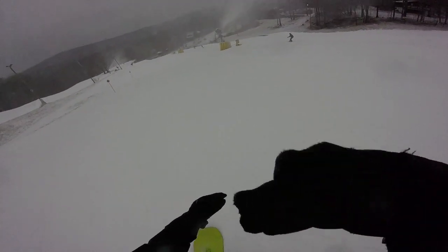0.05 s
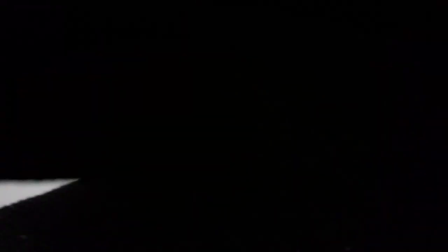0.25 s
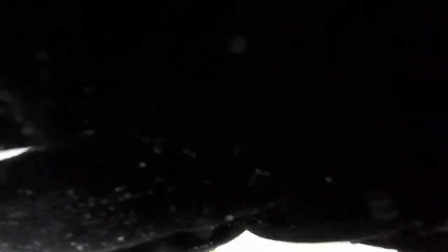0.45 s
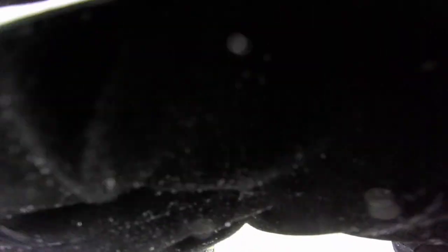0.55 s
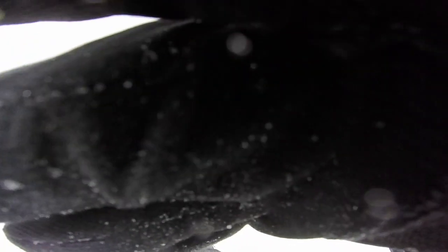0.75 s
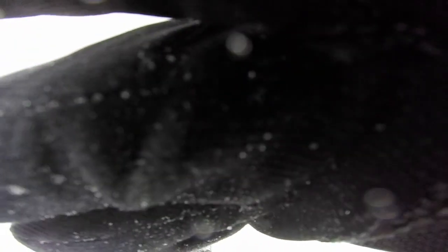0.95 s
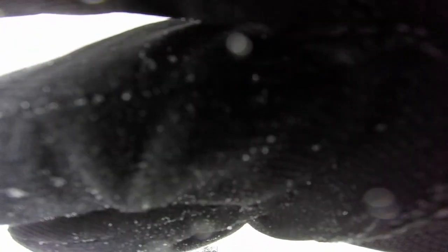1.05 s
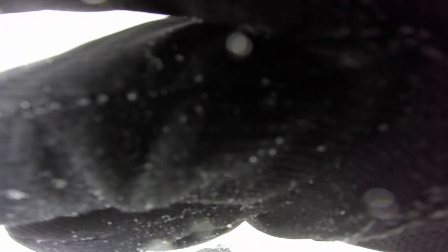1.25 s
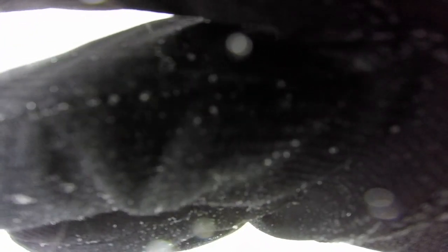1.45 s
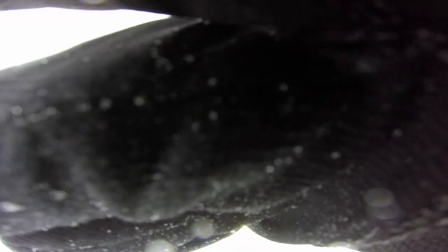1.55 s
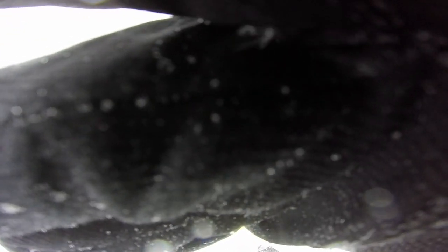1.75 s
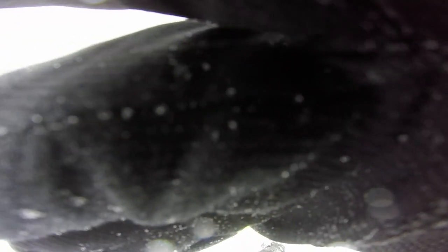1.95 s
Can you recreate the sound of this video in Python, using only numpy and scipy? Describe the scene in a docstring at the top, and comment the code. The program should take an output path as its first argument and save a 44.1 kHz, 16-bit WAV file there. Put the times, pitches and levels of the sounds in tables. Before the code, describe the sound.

Hollow plastic knocks and glove scuffs on a handled camera, over wind and snow hiss.

```python
"""Close, hollow plastic knocks, scuffs and low thumps over a hiss of snow and a rumble of wind.
A gloved hand grabs an action camera in its case while the rider slides down a snowy slope.
Knocks ring the case and the camera body; the glove ticks, drags and presses thumps into the microphone.
Rushing air and sliding snow hiss through the case's resonances, and gusts buffet it from outside."""
import sys
import numpy as np
from scipy import signal
from scipy.fft import rfft, irfft
from scipy.io import wavfile
from scipy.ndimage import uniform_filter1d

SR = 44100
rng = np.random.default_rng(int(sys.argv[2]) if len(sys.argv) > 2 else 0)


def transcribe(signal):
    """Save signal, clipped to [-1, 1], as a 16-bit WAV file at the path in sys.argv[1]."""
    frames = np.atleast_2d(signal).T
    limited = np.clip(frames, -1, 1)
    pcm = np.round(limited * 32767).astype(np.int16)
    wavfile.write(sys.argv[1], SR, pcm)


N = 88200

# bright spectrum of tiny impacts on the case, for glove ticks and snow spray: f/Hz, relative level/dB
TICK_SPECTRUM = [(300, -16), (1000, -17), (2200, -1.5), (4000, -1.5), (5500, -6), (8000, 0.5),
                 (10000, -8.5), (16000, -18)]


def undb(db):
    """Decibels to gain."""
    return 10 ** (np.asarray(db) / 20)


def unit(x):
    """Scale to rms 1."""
    return x / np.sqrt(np.mean(x ** 2) + 1e-18)


def since(start):
    """Seconds since a moment, zero before it."""
    return np.maximum(np.arange(N) / SR - start, 0)


def curve(table, column=1):
    """One column of a table joined by straight lines in time."""
    rows = np.array(table)
    return np.interp(since(0), rows[:, 0], rows[:, column])


def colour(x, points):
    """Minimum-phase EQ through (f/Hz, level/dB) points; result at rms 1."""
    hz, db = np.array(points).T
    bins = np.maximum(np.arange(N // 2 + 1) * SR / N, 1)
    gain = undb(np.interp(np.log(bins), np.log(hz), db))
    cepstrum = irfft(np.log(gain), N)
    cepstrum[1:N // 2] *= 2
    cepstrum[N // 2 + 1:] = 0
    return unit(irfft(rfft(x) * np.exp(rfft(cepstrum)), N))


def noise(points):
    """Coloured noise at rms 1."""
    return colour(rng.standard_normal(N), points)


def split(x, hz):
    """The bands below and above a crossover."""
    low = signal.sosfiltfilt(signal.butter(4, hz, fs=SR, output="sos"), x)
    return low, x - low


def walk(per_s):
    """Random wander at rms 1, gliding to a new value per_s times a second."""
    step = max(int(SR / per_s), 1)
    targets = rng.standard_normal(N)[:N // step + 1]
    return unit(uniform_filter1d(np.repeat(targets, step)[:N], step))


def burst(start, decay_s):
    """Instant attack and exponential fade."""
    age = since(start)
    return (age > 0) * np.exp(-age / decay_s)


def mode(hz, t60):
    """One struck resonance: a sine that falls 60 dB in t60 seconds."""
    age = since(0)[:N // 10]
    return np.sin(2 * np.pi * hz * age) * np.exp(-np.log(1000) * age / t60)


def knocks():
    """Each blow cracks, chatters briefly and rings both the plastic case and the camera inside."""
    # blows on the case: t/s, level/dB, tilt/(dB per octave), favoured f/Hz, rattle/dB, body/dB
    blows = [(0.2339, -22, 4.5, 3150, -16, -1), (0.2874, -24, -5, 1700, -16, -22),
             (.3500, -13.5, -1.5, 2020, -21, -13.5), (.3619, -14.5, 6, 3500, -18, -11),
             (0.6208, -11, 4, 3050, -7, -6), (.6221, -7, -1, 1237, -19, -30),
             (1.0826, -25, 1, 2020, -18, -11), (1.4711, -23.5, -7, 2070, -20, -21)]
    # bright modes of the plastic case: f/Hz, level/dB, t60/s
    case_modes = [(1393, -14.5, 0.03), (1686, -11, 0.031), (2000, -10, 0.017), (2380, -5.5, 0.019),
                  (2700, -4.5, 0.019), (3560, -12, .012), (4210, -6, 0.01), (6000, -13, .004),
                  (7700, -12, .006), (10660, -19, 0.0034)]
    # low modes of the camera body: f/Hz, level/dB, t60/s
    body_modes = [(223, -1, 0.033), (528, -1, .018), (850, -9.5, 0.0044)]
    # spectrum of the contact crack: f/Hz, relative level/dB
    crack_spectrum = [(200, 0.5), (3000, 4), (7000, 1), (11000, -2.5), (16000, -13)]
    rattle_s, crack_db = 0.001, -15
    focus_db, focus_octaves = 10, 0.16
    out = np.zeros(N)
    for start, db, tilt, focus_hz, rattle_db, body_db in blows:
        ring = sum(undb(mode_db + body_db) * mode(hz, t60) for hz, mode_db, t60 in body_modes)
        for k, (hz, mode_db, t60) in enumerate(case_modes):
            # each contact point favours the modes near one pitch
            boost_db = focus_db * np.exp(-(np.log2(hz / focus_hz) / focus_octaves) ** 2)
            gain = undb(mode_db + boost_db + tilt * np.log2(hz / 2500))
            ring += (-1) ** k * gain * mode(hz, t60)
        chatter = rng.standard_normal(N) * burst(start, rattle_s) / np.sqrt(rattle_s * SR / 2)
        force = undb(rattle_db) * chatter
        force[int(start * SR)] += 1  # the blow itself
        crack = undb(crack_db + 2 * tilt) * noise(crack_spectrum) * burst(start, decay_s=0.00095)
        out += undb(db) * (signal.fftconvolve(force, ring)[:N] + crack)
    return out


def thumps():
    """Soft pushes rock the camera on its mount in short, low swells."""
    # pushes on the case: t/s, f/Hz, level/dB, rise/s, decay/s
    pushes = [(.228, 30, -13, 0.0075, .012), (0.2369, 76.9, -6.5, 0.0088, 0.02),
              (.358, 38, -21, 0.0083, 0.016), (.477, 23, -5, .028, .009), (.622, 100, -22.5, 0.0054, .012),
              (.712, 48, -21.5, 0.0142, .016), (0.929, 37.7, -26, 0.017, 0.013),
              (1.061, 28, -17, .024, 0.016), (1.2, 14, -27, .05, .04), (1.425, 125, -35, .015, 0.032),
              (1.97, 45.4, -23, 0.017, .014)]
    out = np.zeros(N)
    for start, hz, db, rise, decay in pushes:
        age = since(start)
        swell = np.sin(np.pi / 2 * np.minimum(age / rise, 1)) ** 2
        fade = np.exp(-since(start + rise) / decay)
        out += undb(db) * swell * fade * np.sin(2 * np.pi * hz * age)
    return out


def scuffs():
    """The glove drags over the case in a grainy run of tiny slips, duller as it settles."""
    # glove strokes: t/s, level/dB, attack/s, hold/s, release/s
    strokes = [(.227, -23, 0.0053, 0.045, 0.014), (0.335, -22.5, 0.015, 0.015, 0.0037),
               (.415, -40, .01, .012, .012), (.472, -34, 0.014, 0.0092, .012),
               (0.602, -34.5, 0.013, 0.023, 0.017), (.65, -29.5, 0.061, .014, 0.029)]
    # spectrum of fabric rubbing on plastic: f/Hz, relative level/dB
    rub_spectrum = [(200, -13), (400, -19.5), (1000, -21), (1200, -16), (1420, -6.5), (1650, -5),
                    (2070, -1), (2400, -0.5), (2700, -3.5), (3000, -9.5), (3950, -14), (4900, -28),
                    (6300, -22), (7800, -23.5), (9200, -32), (12700, -37), (16000, -48)]
    grain_db, dulling_db_per_s = 2.5, 54
    slips = rng.standard_normal(N) * undb(grain_db * walk(per_s=900))
    dull, bright = split(colour(slips, rub_spectrum), hz=4470)
    out = np.zeros(N)
    for start, db, attack, hold, release in strokes:
        pressure = np.minimum(since(start) / attack, 1) * np.exp(-since(start + attack + hold) / release)
        brightness = undb(-dulling_db_per_s * since(start + attack))
        out += undb(db) * pressure * (dull + bright * brightness)
    return out


def ticks():
    """Stiff glove fabric catches and lets go in dry little snaps."""
    # snaps of the glove on the case: t/s, level/dB
    snaps = [(.0888, -41), (0.0922, -35), (.1455, -44), (0.1552, -40), (.1762, -36), (.1947, -42),
             (0.2124, -31.5), (.2368, -25), (.2965, -35), (.3085, -33), (.312, -36), (.322, -35),
             (.336, -33), (.393, -38), (.44, -38), (1.021, -35.5), (1.3, -40), (1.444, -39), (1.53, -38),
             (1.6443, -27.5), (1.675, -38), (1.73, -38), (1.988, -37)]
    return noise(TICK_SPECTRUM) * sum(undb(db) * burst(start, decay_s=0.0013) for start, db in snaps)


def rush():
    """Air and sliding snow hiss through the case, fluttering slightly, with a fine patter of spray."""
    # swells of the hiss: t/s, low band level/dB, treble level/dB
    swells = [(0, -42, -59.5), (.2, -42.5, -61), (.41, -40, -49), (.6, -39, -50), (.75, -40.5, -50),
              (.86, -41, -54.5), (1.1, -42, -52.5), (1.36, -43, -53.5), (1.52, -41, -50.5),
              (1.62, -42, -54), (1.75, -40.5, -50), (1.89, -39, -46.5), (2, -41.5, -51.5)]
    # hiss as shaped by the case's resonances: f/Hz, relative level/dB
    hiss_spectrum = [(60, -12.5), (200, -10), (300, -6.5), (500, -10), (750, -13), (1050, -16),
                     (1230, -12.5), (1420, -2.5), (1900, -2.5), (2450, -4), (3200, -11), (4050, -9),
                     (4800, -20), (6200, -15), (6800, -16.5), (7400, -13.5), (8200, -18), (9000, -20.5),
                     (10100, -25), (11000, -23.5), (12000, -28), (14500, -32.5), (16000, -50)]
    flutter_db = 0.86
    spray_per_s, spray_db, spray_spread_db = 190, -4.5, 5
    low, treble = map(unit, split(noise(hiss_spectrum), hz=3130))
    hits = rng.random(N) < spray_per_s / SR
    grains = hits * rng.standard_normal(N) * undb(spray_spread_db * rng.random(N))
    spray = undb(spray_db) * colour(grains, TICK_SPECTRUM)
    treble = treble * undb(flutter_db * walk(per_s=39.86)) + spray
    hiss = low * undb(curve(swells)) + treble * undb(curve(swells, column=2))
    return hiss * undb(flutter_db * walk(per_s=25.06))


def wind():
    """Eddies buffet the case with a gusty rumble."""
    # strength of the wind on the case: t/s, level/dB
    strength = [(0, -41), (.12, -35.5), (.3, -35.5), (.45, -38), (.7, -33.5), (.85, -39), (1.2, -39),
                (1.45, -36), (1.65, -37), (1.85, -34.5), (2, -37)]
    # bass-heavy spectrum of the buffeting: f/Hz, relative level/dB
    rumble_spectrum = [(12, -3.5), (28, 1.5), (50, -6), (80, -8), (130, -10.5), (200, -17), (400, -24.5),
                       (800, -33), (1500, -51.5)]
    gust_db = 1.5
    return noise(rumble_spectrum) * undb(curve(strength) + gust_db * walk(per_s=14.06))


def scene():
    """Close handling sounds over a bed of snow hiss and wind, in mono."""
    return (knocks() + thumps() + scuffs() + ticks() + rush() + wind())[None]


def record(dry):
    """The camera drops subsonic drift below 12 Hz and cuts the top above 15.5 kHz."""
    low_cut = signal.butter(2, 12, "high", fs=SR, output="sos")
    high_cut = signal.ellip(8, .2, 80, 15500, fs=SR, output="sos")
    return signal.sosfilt(high_cut, signal.sosfilt(low_cut, dry))


dry = scene()
out = record(dry)
transcribe(out)
```